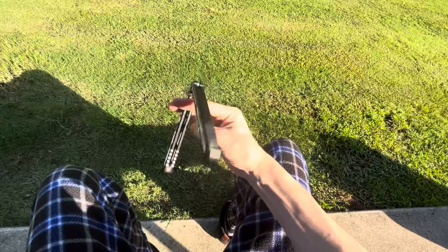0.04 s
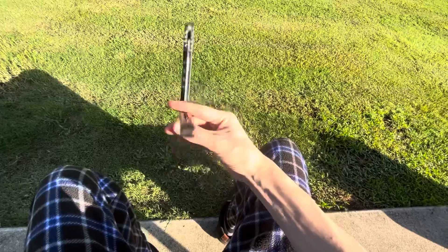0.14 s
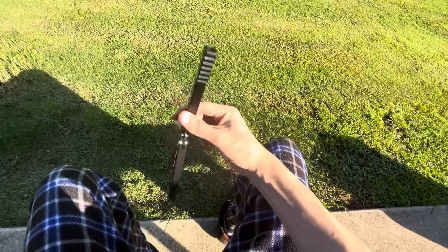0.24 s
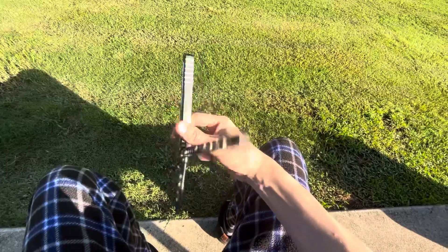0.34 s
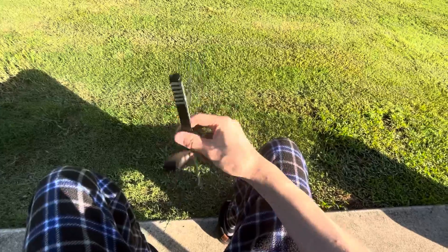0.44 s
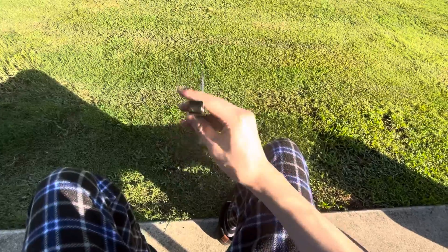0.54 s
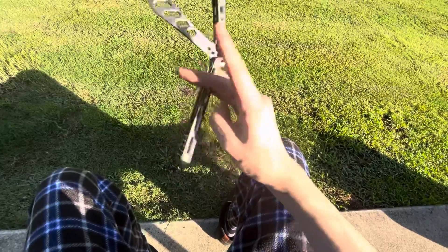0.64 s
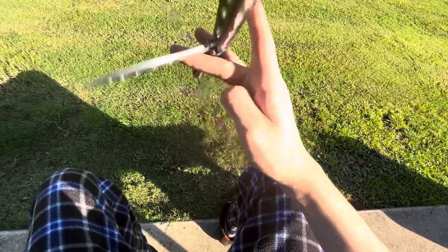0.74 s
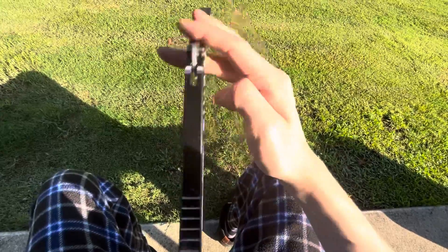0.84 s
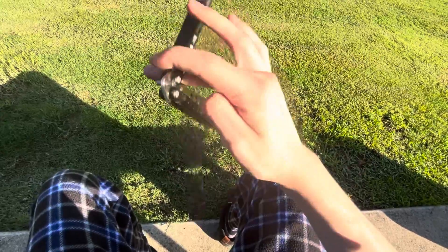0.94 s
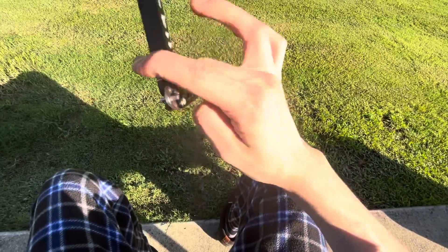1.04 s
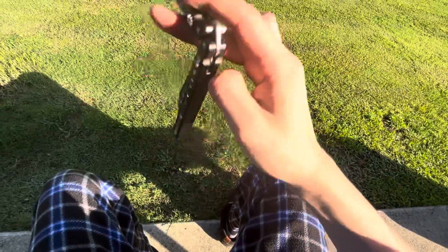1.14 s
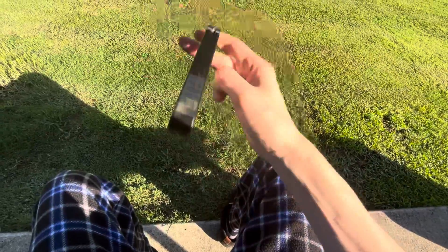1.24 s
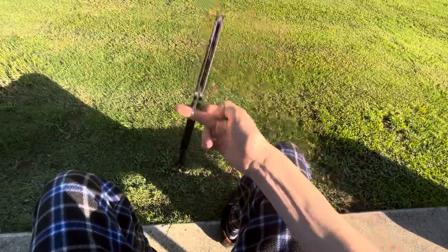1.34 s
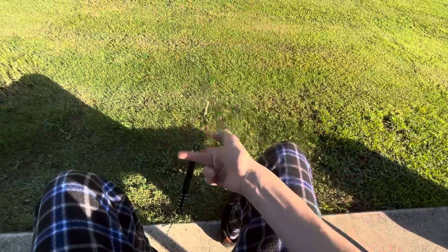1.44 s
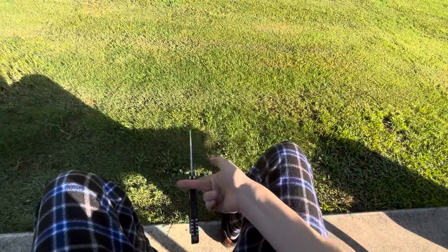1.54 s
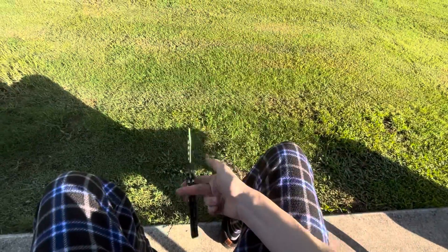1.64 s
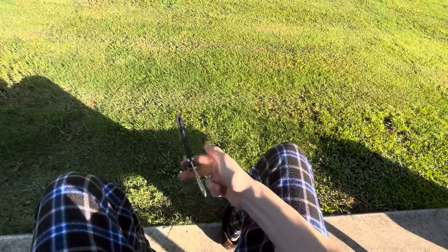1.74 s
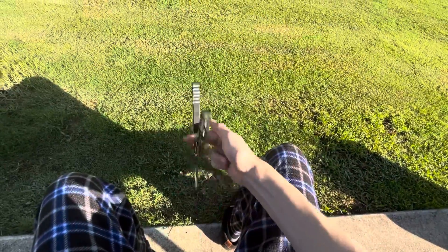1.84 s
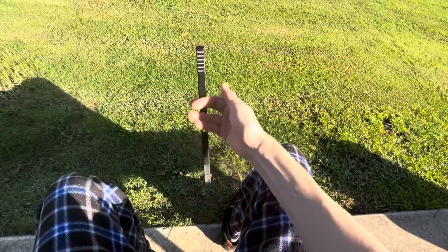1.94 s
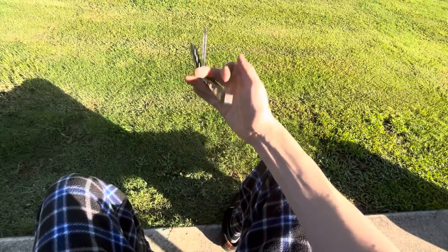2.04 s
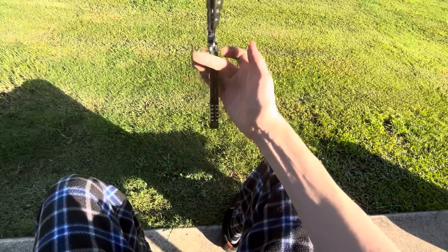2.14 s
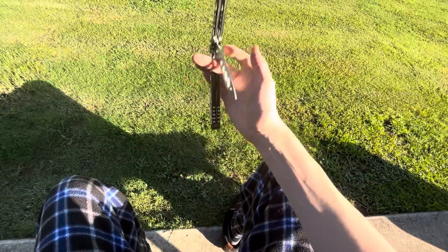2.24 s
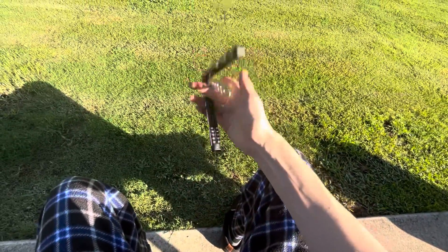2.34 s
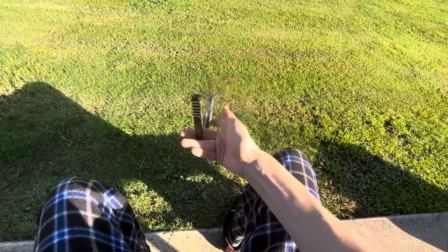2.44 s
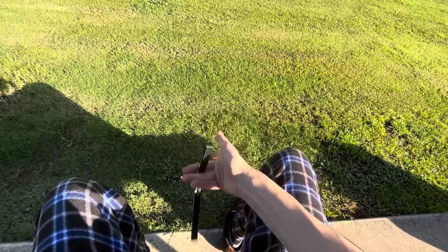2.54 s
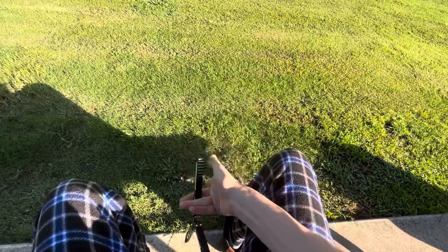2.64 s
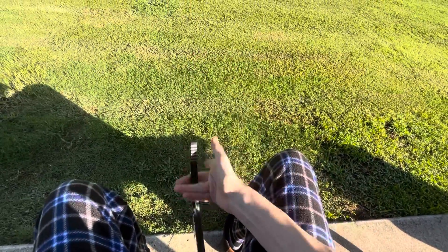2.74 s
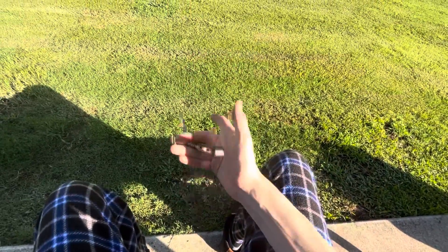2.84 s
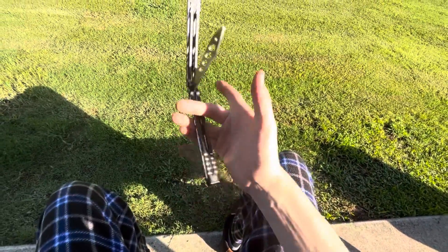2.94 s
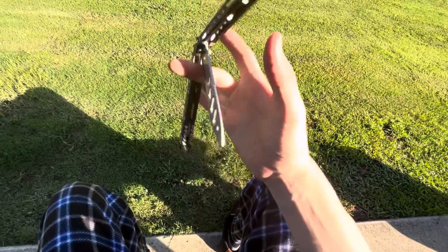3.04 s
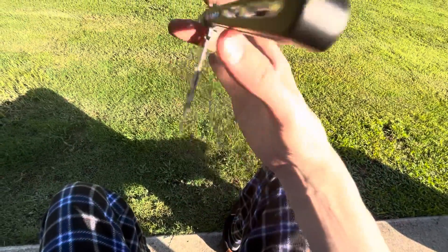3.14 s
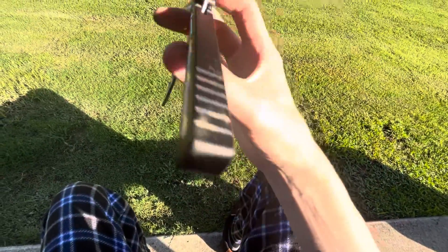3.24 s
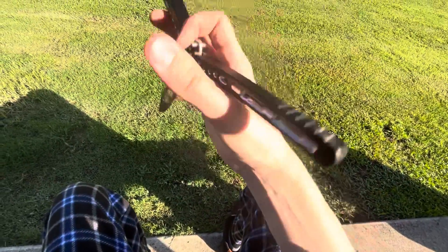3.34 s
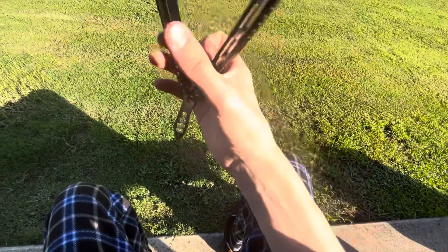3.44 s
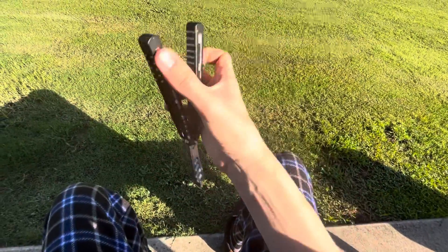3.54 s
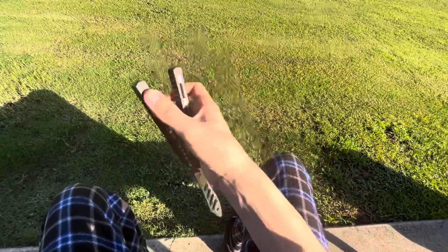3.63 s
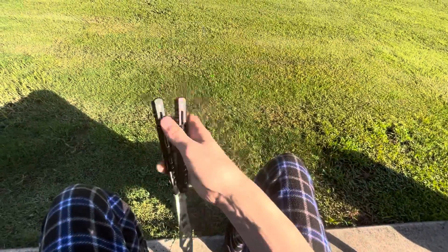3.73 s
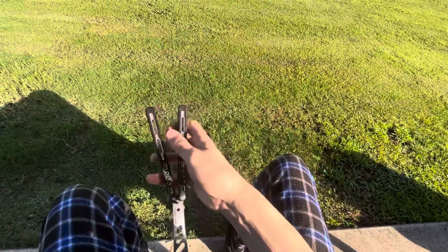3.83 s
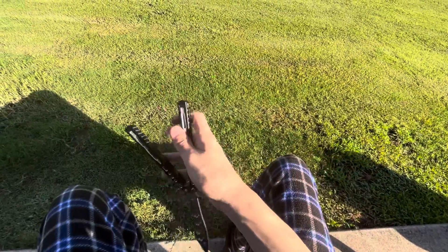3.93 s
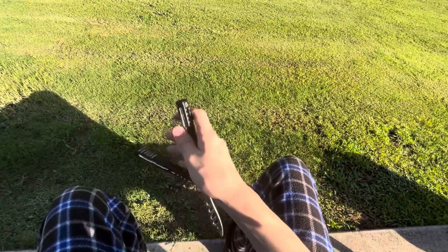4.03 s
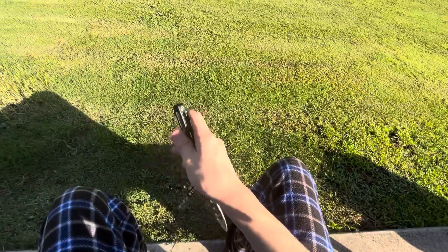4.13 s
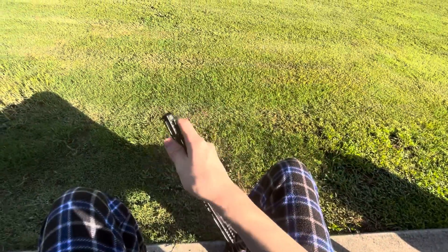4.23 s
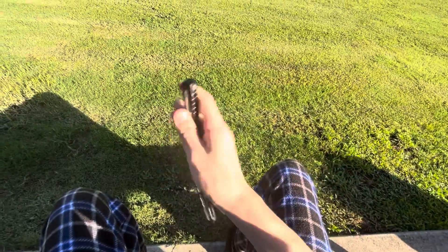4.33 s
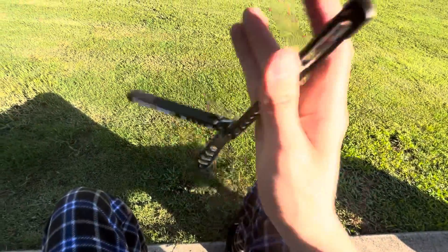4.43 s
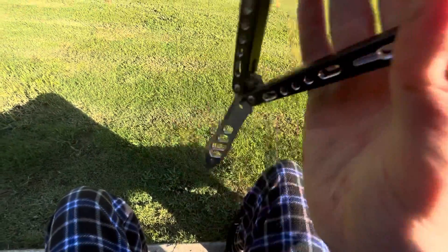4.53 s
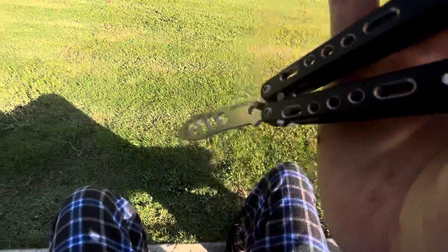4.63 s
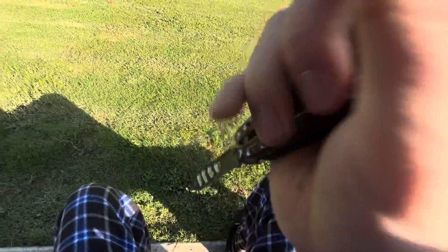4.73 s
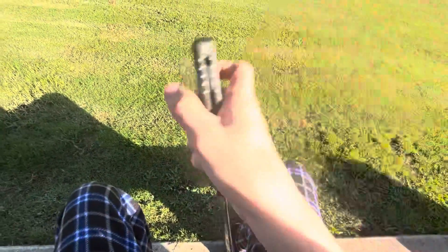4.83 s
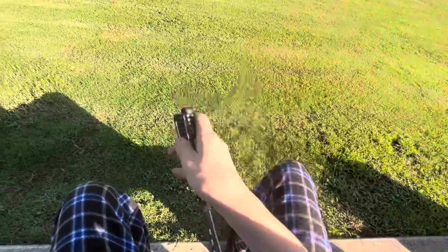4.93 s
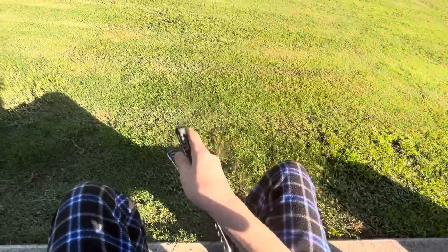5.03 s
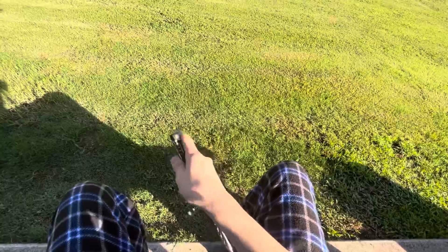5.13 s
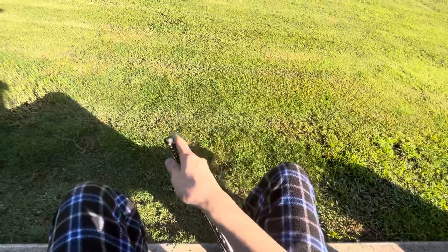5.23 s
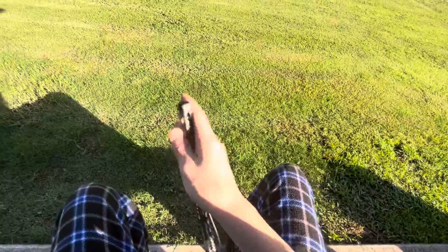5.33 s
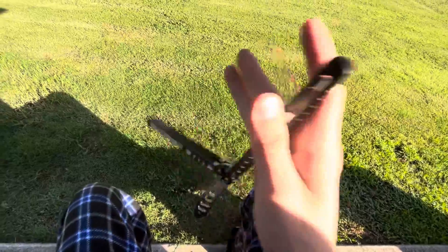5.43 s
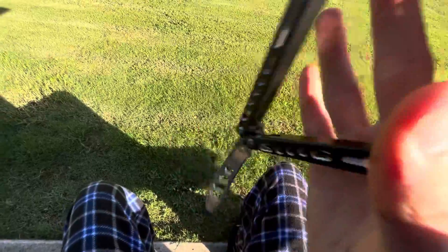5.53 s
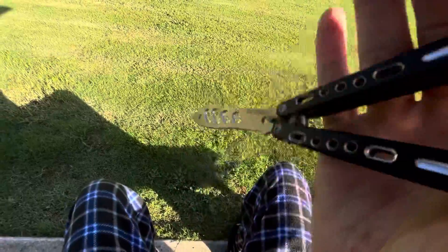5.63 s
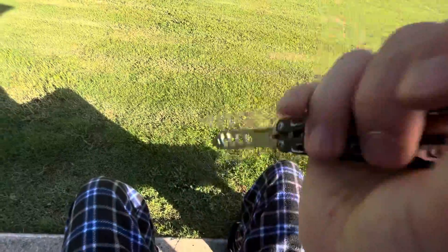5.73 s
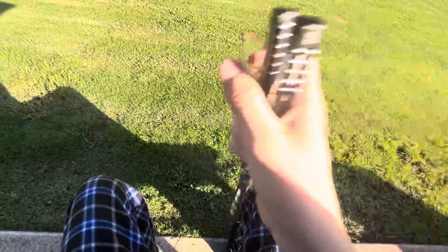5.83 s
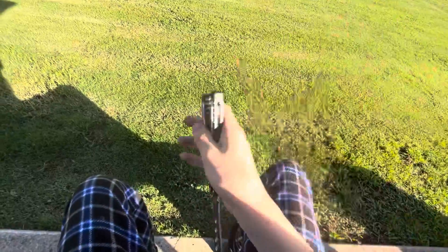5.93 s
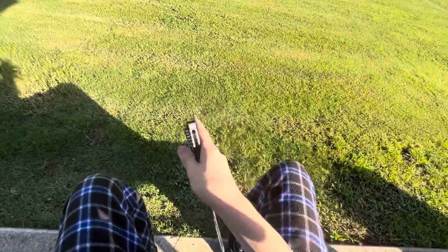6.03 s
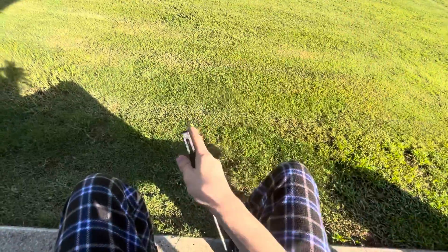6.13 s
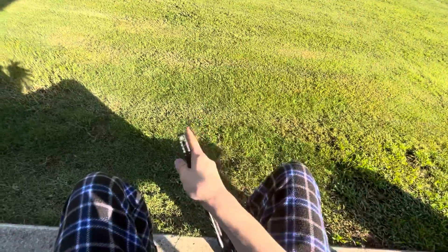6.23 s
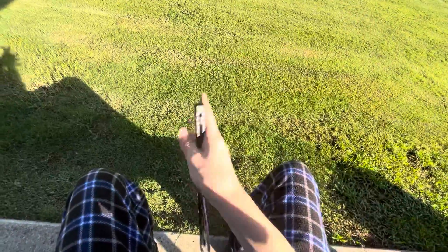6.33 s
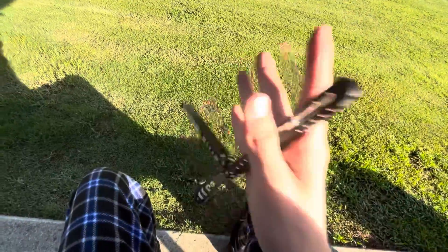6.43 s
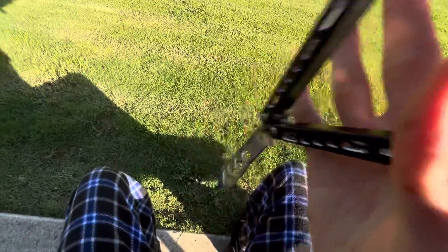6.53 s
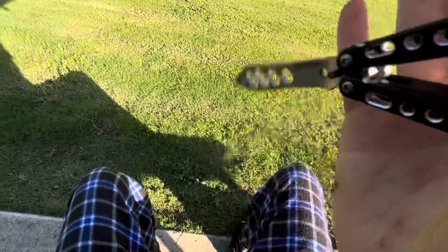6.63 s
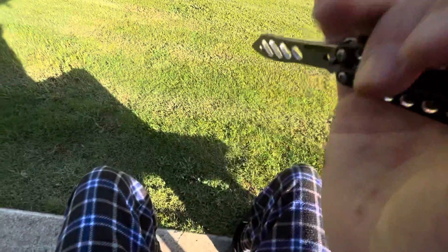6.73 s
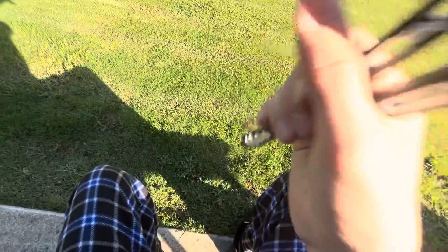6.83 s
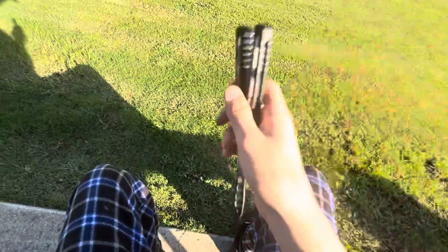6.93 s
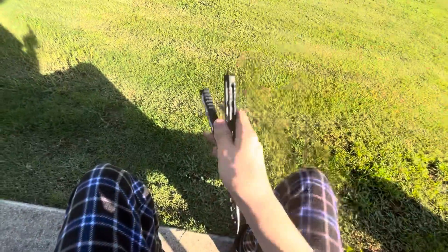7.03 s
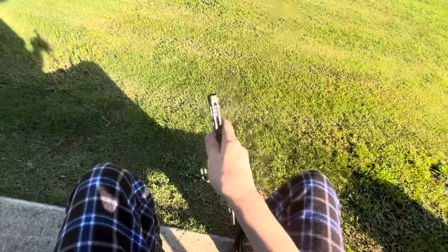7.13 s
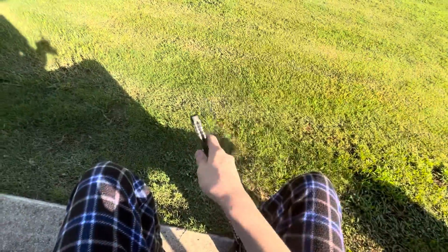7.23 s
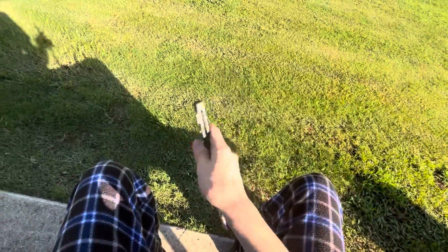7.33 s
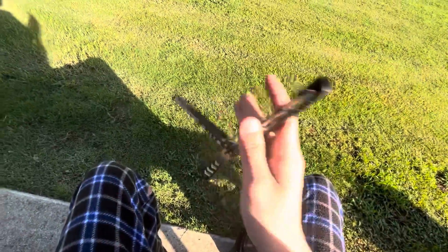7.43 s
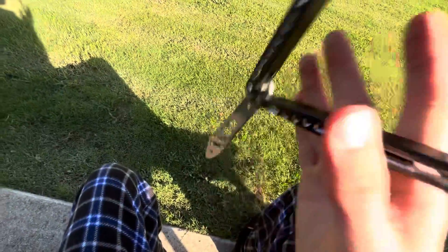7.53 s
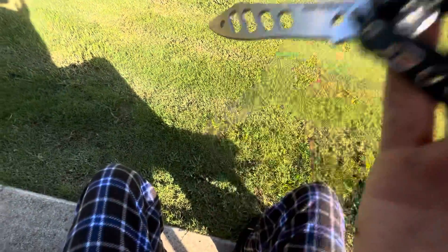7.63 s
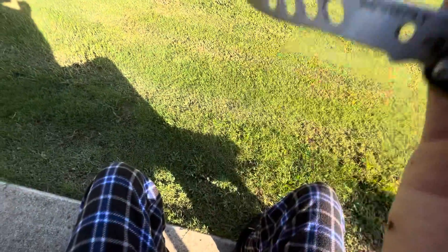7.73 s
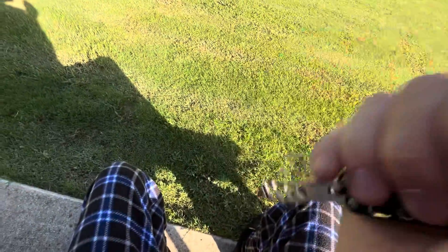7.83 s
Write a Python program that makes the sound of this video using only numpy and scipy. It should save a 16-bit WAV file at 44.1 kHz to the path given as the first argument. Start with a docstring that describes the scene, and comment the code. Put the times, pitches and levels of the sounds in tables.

```python
"""On a lawn, wind rumbles and leaves hiss throughout: flickering shaped noise at a phone's two microphone ports.
From the start a butterfly knife trainer is flipped close in front; its slotted handles strike damped ringing modes.
From 0.4 s an insect buzzes and far bird calls blur into soft noise swells; from 1.3 s birds whistle off to the right.
One far thump of decaying noise falls at 1.4 s, finger thuds lie between, and from 4.3 s low puffs hit the right port.
Near 4.6, 5.6, 6.6 and 7.6 s the blows crowd into rattles, with dense random taps as the handles shudder to rest."""
import sys
import numpy as np
from scipy import signal
from scipy.fft import rfft, irfft, next_fast_len
from scipy.io import wavfile
from scipy.ndimage import uniform_filter1d

SR = 44100
rng = np.random.default_rng(int(sys.argv[2]) if len(sys.argv) > 2 else 0)


def dump_mix(stems):
    """Bounce the given channels to the path in sys.argv[1] as a 16-bit WAV at rate SR."""
    frames = np.atleast_2d(stems).T  # one column per channel
    limited = np.clip(frames, -1, 1)  # hard clip at full scale
    pcm = np.round(limited * 32767).astype(np.int16)
    wavfile.write(sys.argv[1], SR, pcm)


N = 347067

# Source levels are nominal: port balance, flicker, scatter and the microphone's gain come after them.
# wind across the lawn, and broad hiss of leaves plus the wash around the rattles:
# (time [s], rumble level [dB], hiss level [dB])
AIR_LEVELS = [(0.0, -51.5, -64.5), (0.55, -52.5, -64.5), (1.36, -52, -65.5), (1.99, -52, -64),
              (2.25, -51, -59.5), (2.55, -54, -64), (3.15, -51, -63.5), (3.7, -52, -65), (4.36, -49.5, -64),
              (4.69, -50.5, -59), (5.1, -51, -66.5), (5.72, -51, -57.5), (6.05, -59, -64),
              (6.53, -63, -61.5), (6.93, -64.5, -64), (7.15, -55.5, -61.5), (7.43, -50, -62),
              (7.87, -61, -63)]
# spectra of wind rumble and of broad hiss: (frequency [Hz], density [dB per Hz])
RUMBLE_SPECTRUM = [(25, -53), (40, -9), (55, 5.5), (75, -2), (105, 4), (150, -1), (210, -10.5), (300, -24),
                   (500, -27), (800, -39)]
HISS_SPECTRUM = [(200, 9.5), (400, 0.5), (750, -7), (1300, -4), (1700, -7), (2700, -3.5), (4000, -6.5),
                 (5400, -4), (6500, -14), (9800, -15), (11500, -32), (16000, -33)]
# far bird whistles: (time [s], length [s], first pitch [Hz], last pitch [Hz], level [dB])
BIRD_WHISTLES = [(1.306, 0.21, 3640, 3540, -69), (1.7, 0.29, 3620, 3480, -72),
                 (2.23, 0.039, 4920, 4760, -58), (2.292, 0.043, 4880, 5640, -56),
                 (2.399, 0.048, 5300, 4950, -55), (2.446, 0.057, 5770, 4880, -56.5),
                 (3.11, 0.12, 2380, 2530, -63.5), (3.24, .12, 2500, 2490, -68.5),
                 (3.62, 0.033, 3430, 3570, -62), (3.68, 0.058, 2900, 3200, -60),
                 (7.004, 0.2, 8560, 9660, -68), (7.25, .06, 9100, 8700, -74),
                 (7.44, 0.13, 4070, 4250, -60.5)]
# insect buzzes near one pitch: (time [s], length [s], level [dB])
INSECT_BUZZES = [(0.424, 0.15, -69.5), (0.99, 0.093, -70), (1.798, 0.14, -76), (2.83, 0.19, -75),
                 (3.44, 0.17, -69.5), (4.038, 0.19, -71.5), (5.08, 0.24, -72.5), (6.22, .15, -71.5),
                 (6.953, .12, -70)]
INSECT_HZ, INSECT_WIDTH_HZ = 8270, 71
# far blurred bird calls, as soft narrow noise swells: (time [s], length [s], centre [Hz], level [dB])
BLURRED_CALLS = [(0.417, 0.2, 2560, -64), (0.715, 0.2, 2390, -68), (.9, 0.34, 2420, -66),
                 (1.976, 0.23, 4500, -58), (2.217, 0.35, 4370, -58), (2.829, 0.17, 2600, -62),
                 (3.302, 0.21, 2780, -66), (3.659, 0.32, 2820, -63.5), (4.052, 0.56, 2470, -66.5),
                 (6.307, 0.19, 2600, -75), (6.899, 0.39, 2700, -67)]
BLUR_WIDTH = 0.17  # share of the centre
THUMP_S, THUMP_DB, THUMP_T60_S = 1.438, -47, 0.52
# puffs of air on the right port: (time [s], length [s], level [dB])
AIR_PUFFS = [(4.301, 0.12, -50), (5.24, 0.075, -48), (5.548, 0.068, -30.5), (5.668, 0.096, -44.5),
             (5.736, .05, -33), (5.793, 0.063, -47), (5.878, 0.063, -44), (6.34, 0.042, -44),
             (6.45, 0.041, -47.5)]
PUFF_HZ = 83
BACK_PORT = -0.38  # gain: close low pressure reaches the left port weaker and reversed
# soft thuds and ticks of fingers on the handles: (time [s], level [dB], pitch [Hz], t60 [s])
FINGER_TAPS = [(.168, -45.5, 855, .02), (.191, -50, 750, 0.022), (.266, -47, 706, 0.022),
               (.288, -43.5, 680, 0.015), (0.298, -46.5, 1330, 0.01), (0.596, -55, 1410, .015),
               (2.289, -41.5, 296, 0.018), (2.385, -34, 292, 0.022), (2.798, -48, 4150, .008),
               (3.099, -42, 500, 0.014), (4.224, -47, 480, 0.019), (5.251, -44, 490, 0.016),
               (6.255, -42.5, 480, 0.016)]
# the handles shudder to rest: (time [s], length [s], level [dB])
HANDLE_SHUDDERS = [(4.664, 0.042, -22), (5.691, 0.052, -21), (5.726, 0.022, -37), (6.726, 0.029, -30),
                   (7.721, 0.056, -22.5)]
SHUDDER_RATE = 1000  # mean taps a second
# blows of handle on handle or pin: (time [s], clack level [dB], knock pitch [Hz],
# then levels above the clack [dB] of knock, edge, knock ring, blade ring and handle ring,
# left minus right [dB])
KNIFE_BLOWS = [(0.0027, -43.5, 2490, 1, 2.5, -30, -15, -32, -7),
               (0.0122, -49, 2120, 6, 5.5, -7, -15, -26, 5),
               (0.3462, -16, 2740, -11, 0.5, -28, -26, -29, -1.5),
               (0.3474, -20, 2950, -9, -9, -42, -20, -30, -1),
               (0.9582, -40.5, 2270, 9, 2, -16, -16, -18, 1),
               (1.4283, -36.5, 2390, 7.5, 8, -21, -16, -16, 4.5),
               (1.9646, -38.5, 2240, 0, -2, -30, -26, -40, -2),
               (2.0865, -18.5, 2550, 2, 3.5, -24, -15.5, -28, -2.5),
               (2.3819, -23, 2780, -10.5, -4, -23, -30, -29, 0), (2.39, -29, 2610, -9, 0, -24, -16, -34, 2),
               (2.72, -28.5, 2480, -5.5, -6.5, -39, -42, -28, -4.5),
               (3.0967, -49, 2800, 4, 0, -9, 11.5, -26, 3.5), (3.243, -60, 2220, 1, 3, 1, 1, 0, 2),
               (3.338, -57.5, 2560, -6, 5, -16, 0, 3, 2), (4.072, -54.5, 2650, 8, -6, -16.5, -31, -41, 0),
               (4.2249, -30, 2600, -6, -6, -18, -23, -26, -0.5),
               (4.411, -40.5, 2590, 0.5, -6, -23, -43, -25, -2),
               (4.5615, -12.5, 2550, -2, -5.5, -31, -20, -20.5, -4.5),
               (4.5958, -3.5, 2780, -24, -14.5, -49.5, -37, -21, -7.5),
               (4.6287, -14, 2610, -6.5, -5, -46, -43, -32, -7),
               (4.6486, -6, 2750, -10.5, -20, -34.5, -30, -29, -10),
               (4.6566, -9, 2490, -7, -16, -31, -24, -18, 2),
               (4.6655, -10, 2775, 1, -11, -26, -34, -35, -15),
               (4.6762, -14.5, 2820, -2, -9.5, -28.5, -23.5, -22, -13),
               (4.6818, -10, 2770, -21.5, -7, -21, -42, -35, 11),
               (4.692, -14.5, 2720, -7, -12, -29, -25, -32, -9.5),
               (4.6967, -5.5, 2340, -15, -11, -26.5, -35, -29.5, -2),
               (5.2513, -31, 2420, 0, -8, -30.5, -22, -37, -3),
               (5.368, -32, 2620, -2.5, -10.5, -16, -43, -36, -4.5),
               (5.5449, -11, 2530, -3, -6, -28, -22, -25, -2),
               (5.5916, -14.5, 2580, -3, 1.5, -35.5, -20, -7, -5),
               (5.6251, -15, 2710, -0.5, -4.5, -31.5, -47, -42, -6.5),
               (5.646, -11.5, 2620, -4, 1.5, -42.5, -22, -2, 0.5),
               (5.666, -13, 2680, 1, -7, -27.5, -51, -33, -6.5),
               (5.681, -8, 2820, -6.5, -7.5, -34, -47, -38, -4),
               (5.692, -10.5, 2490, -11, 0, -32, -31.5, -31, 11.5),
               (5.7003, -15, 2900, -9.5, -2, -28.5, -17, -24.5, -14),
               (5.707, -12, 2500, -15, -7, -32.5, -23, -22, 10),
               (5.7132, -15.5, 2600, -27, -8, -25, -26.5, -20, 6),
               (5.7191, -16.5, 2550, -11, 1.5, -28.5, -26, -31, 15),
               (5.734, -24, 2400, -16, -1, -15.5, -41, -33, -8.5),
               (6.2552, -30.5, 2480, -4, -5.5, -43.5, -24, -36, 2),
               (6.379, -22.5, 2640, 1, -11, -39, -43, -43, -5),
               (6.403, -40, 2830, 1, -8, -24, -35, -37, -4),
               (6.5465, -12.5, 2380, -5, -4.5, -30, -19, -34, 0),
               (6.5853, -10.5, 2545, -9.5, -0.5, -48, -15, -15.5, -2.5),
               (6.6115, -14.5, 2740, -4.5, -8, -33, -24, -20.5, 5),
               (6.6313, -13, 2800, -7.5, -5, -36.5, -34, -31, -10),
               (6.6488, -11, 2596, -5, -2, -25.5, -21, -20.5, 2),
               (6.6688, -10, 2780, -5, -9, -41, -35, -47, -1),
               (6.6889, -11, 2760, -7, -4.5, -46, -21.5, -24, 4),
               (6.7099, -10, 2670, -8, -8, -48.5, -30, -43, -5),
               (6.7391, -21, 2400, -19.5, -18, -28, -17, -25, -19),
               (6.7433, -8, 2890, -10.5, -9, -23.5, -34, -30.5, -5.5),
               (7.0659, -38, 2550, 11, -3, -32.5, -35, -39, 1),
               (7.0795, -47, 2340, 8, -2, -10, -24, -33, -4),
               (7.232, -35, 2400, 7.5, -2.5, -18, -22, -35, -1),
               (7.3964, -27.5, 2470, 2, -7.5, -40.5, -31, -38, -1.5),
               (7.417, -40.5, 2280, 2.5, -11, -18.5, -28, -42, -4),
               (7.5545, -9.5, 2420, -7, -7, -23, -30, -27, -1),
               (7.6193, -14.5, 2960, -7, 2, -39, -37, -4.5, -1.5),
               (7.661, -16.5, 2620, 5.5, -3, -12, -31, -39, -5),
               (7.689, -8.5, 2860, -5.5, -7.5, -50, -43, -26, -4),
               (7.711, -23.5, 2400, 1, 1, -30, -36, -24, 2),
               (7.7255, -12, 2770, -8, -12, -31, -29, -40, -15.5),
               (7.737, -12.5, 2660, -9, -14, -20, -29, -34, -12),
               (7.7455, -15.5, 2680, -6, -6, -30, -22, -25, 7.5),
               (7.7519, -15, 2600, -15, -7, -22.5, -31, -26, 3)]
# names of the mode families of the knife, in the order of their levels in a blow: (family)
MODE_FAMILIES = ["clack", "knock", "knock ring", "thud", "crack", "edge", "blade ring", "handle ring"]
# short modes of the knife: (family, frequency [Hz], level [dB], t60 [s])
KNIFE_MODES = [("clack", 6600, 0, .015), ("clack", 6250, -7.5, 0.01), ("clack", 7050, -5.5, 0.0092),
               ("knock", 2585, 0, 0.013), ("knock", 2240, -4.5, 0.0058), ("knock", 3073, -6, 0.0067),
               ("thud", 330, -5, 0.023), ("thud", 550, -4, 0.0069), ("thud", 900, -5.5, 0.0046),
               ("thud", 1250, -2, 0.012), ("thud", 1677, 2.5, 0.0059), ("crack", 3624, -7.5, 0.0071),
               ("crack", 4100, -7, 0.0071), ("crack", 4600, -4.5, 0.007), ("crack", 5150, -1.6, .011),
               ("crack", 5650, -0.5, .007), ("edge", 7700, -3.5, .007), ("edge", 8500, -7.5, 0.0058),
               ("edge", 9300, -5.5, 0.0048), ("edge", 10600, -9, 0.0037), ("edge", 11350, -1.2, 0.011),
               ("edge", 11000, -8, 0.005), ("edge", 13200, -13, .005), ("edge", 14600, -12, .006),
               ("edge", 15500, -19.5, 0.015), ("clack", 6640, -32, .06)]
# long rings of the knife: (family, frequency [Hz], level [dB], t60 [s])
KNIFE_RINGS = [("knock ring", 2560, 1, .09), ("blade ring", 10150, 5, .1), ("blade ring", 9860, -1, .09),
               ("handle ring", 13730, 3, .065), ("handle ring", 14080, -3, .11)]
# families that follow from the others:
# (level above the clack [dB], then slopes [dB per dB] on clack, knock and edge level)
THUD_LEVEL_RULE = (-16.5, -.22, 0.1, 1.42)
CRACK_LEVEL_RULE = (-3, 0.05, 0.32, 0.2)
CLACK_SPREAD_HZ, SCATTER_DB = 450, 6  # full random range from blow to blow
SWELL_LEAD_S, SWELL_S = 0.0017, 0.0016  # the swell of a blow: its start ahead of the listed time; its rise time
MUTE_DB, PORT_LAG_S = -16, 0.00023  # left over after the next contact; delay of the swell at the left port
FIRM_HZ, FIRM_TURNS, FIRM_TURNS_PER_HZ = 9000, -.77, .000102  # phase step between the ports above FIRM_HZ
SCRAPE_DB, SCRAPE_HZ, SCRAPE_WIDTH_HZ, SCRAPE_T60_S = -18, 3900, 2340, 0.0089  # level is above the clack
WASH_DB, WASH_T60_S = -29, .013  # near wash
TOP_HZ = 16900  # upper limit of the microphone


def undb(db):
    """dB to gain."""
    return 10 ** (np.asarray(db) / 20)


def add(out, s, sound):
    """Mix a two-channel sound in at s seconds."""
    i = int(s * SR)
    out[:, i:i + sound.shape[1]] += sound[:, :N - i]


def fade(t, t60_s):
    """Exponential decay, -60 dB at t60."""
    return np.exp(-np.log(1000) * t / t60_s)


def walk(rate):
    """Random levels held 1 / rate s and slewed twice; spread near 1."""
    hold = int(SR / rate)
    steps = np.repeat(rng.standard_normal(N // hold + 1), hold)
    return 0.49 * uniform_filter1d(uniform_filter1d(steps, hold), hold)[:N]


def band(hz, width_hz, size=N):
    """Two unrelated channels of noise around one pitch, rms 1."""
    f = np.arange(size // 2 + 1) * SR / size
    bell = np.exp(-.5 * ((f - hz) / width_hz) ** 2)
    noise = irfft(rfft(rng.standard_normal((2, size))) * bell, size)
    return noise / np.sqrt(np.mean(noise ** 2))


def air(spectrum, alike_hz, flicker_db):
    """Shaped noise whose octaves flicker alone; the ports grow more alike below alike_hz; their mean has rms 1."""
    size = next_fast_len(N)
    f = np.maximum(np.arange(size // 2 + 1) * SR / size, 1)
    hz, db = np.transpose(spectrum)
    shape = undb(np.interp(np.log(f), np.log(hz), db, left=-80))
    mid, side = rfft(rng.standard_normal((2, size))) * shape
    side = side * np.clip(f / alike_hz, .3, 1.05)
    ports = np.array([mid + side, mid - side])
    out = 0
    for octave in np.arange(np.floor(np.log2(hz[0])), np.log2(hz[-1]) + 1):
        part = np.cos(np.pi / 2 * np.clip(np.log2(f) - octave, -1, 1)) ** 2
        out = out + irfft(ports * part, size)[:, :N] * undb(flicker_db * walk(9))
    return out / np.sqrt(np.mean(out.mean(0) ** 2))


def rumble_and_hiss():
    """Wind rumble, and broad hiss of leaves plus the wash around the rattles: two noises on slow level curves."""
    s, *columns = np.transpose(AIR_LEVELS)
    rumble_db, hiss_db = (np.interp(np.arange(N) / SR, s, column) for column in columns)
    rumble = air(RUMBLE_SPECTRUM, 600, flicker_db=2.0) * undb(rumble_db)
    hiss = air(HISS_SPECTRUM, 600, flicker_db=2.5) * undb(hiss_db)
    return rumble + hiss


def blurred_calls():
    """Far blurred bird calls: narrow noise that swells and fades."""
    out = np.zeros((2, N))
    for s, length_s, hz, db in BLURRED_CALLS:
        size = int(length_s * SR)
        noise = band(hz, BLUR_WIDTH * hz, size=32768)[:, :size]
        add(out, s, undb(db) * noise * np.hanning(size) ** .5)
    return out


def wildlife():
    """Gliding whistles of far birds, off to the right, and a narrow insect buzz."""
    out = np.zeros((2, N))
    for s, length_s, first_hz, last_hz, db in BIRD_WHISTLES:
        size = int(length_s * SR)
        phase = np.cumsum(np.linspace(first_hz, last_hz, size)) * 2 * np.pi / SR
        whistle = np.sin(phase + np.array([[1.5], [0]])) * np.array([[1.1], [1.9]])
        add(out, s, undb(db) * np.hanning(size) ** .5 * whistle)
    # moving air breaks the whistles up on their way
    out = out * undb(-1.5 + 8.2 * walk(90))
    buzz = band(INSECT_HZ, INSECT_WIDTH_HZ, size=next_fast_len(N))
    for s, length_s, db in INSECT_BUZZES:
        size, i = int(length_s * SR), int(s * SR)
        add(out, s, undb(db) * np.hanning(size) ** .5 * buzz[:, i:i + size])
    return out


def thump():
    """A far bang smeared by echoes, as decaying noise: the treble dies first."""
    out, t = np.zeros((2, N)), np.arange(20000) / SR
    low = band(300, 100, size=20000) * fade(t, THUMP_T60_S)
    high = band(770, 800, size=20000) * fade(t, 0.72 * THUMP_T60_S) * undb(-2.5)
    add(out, THUMP_S, undb(THUMP_DB) * (low + high) * np.minimum(t / 0.0055, 1))
    return out


def puffs():
    """Short low buffets of air pushed by the hand, as windowed low noise."""
    out = np.zeros((2, N))
    for s, length_s, db in AIR_PUFFS:
        size = int(length_s * SR)
        buffet = band(PUFF_HZ, 0.83 * PUFF_HZ, size=8192)[0, :size] * np.hanning(size) ** 0.47
        buffet = buffet / np.sqrt(np.mean(buffet ** 2))
        add(out, s, undb(db) * buffet * np.array([[BACK_PORT], [1]]))
    return out


def fingers():
    """Dull thuds and ticks: damped sines, stronger on the right."""
    out, t = np.zeros((2, N)), np.arange(3000) / SR
    for s, db, hz, t60_s in FINGER_TAPS:
        tap = np.sin(2 * np.pi * hz * t) * fade(t, t60_s)
        add(out, s, undb(db) * tap * np.array([[.8], [1.2]]))
    return out


def shudder():
    """Dense random taps of uneven size into the short modes, swelling briefly and dying away."""
    taps, t = np.zeros((2, N)), np.arange(900) / SR
    for s, length_s, db in HANDLE_SHUDDERS:
        draw = rng.random((3, int(length_s * SR)))
        sizes = (draw[0] < SHUDDER_RATE / SR) * undb(-12 * draw[1:]) * np.array([[.7], [1.2]])
        add(taps, s, undb(db) * sizes * np.cos(np.linspace(-1.2, np.pi / 2, draw.shape[1])))
    above_db = {"clack": 0, "knock": -8, "thud": -22, "crack": -6, "edge": -7}
    ring = np.zeros((2, len(t)))
    for family, hz, db, t60_s in KNIFE_MODES:
        tone = np.sin(2 * np.pi * (hz * t + rng.random((2, 1))))
        ring += undb(db + above_db[family]) * tone * fade(t, t60_s)
    return signal.fftconvolve(taps, ring, axes=1)[:, :N]


def knife():
    """Each blow rings all modes with its own phases; the next contact mutes what still rings."""
    out, t = np.zeros((2, N)), np.arange(5000) / SR
    modes = KNIFE_MODES + KNIFE_RINGS
    group = np.array([MODE_FAMILIES.index(mode[0]) for mode in modes])
    hz, db, t60_s = np.transpose([mode[1:] for mode in modes])
    clack, knock, thud = (group == MODE_FAMILIES.index(name) for name in ("clack", "knock", "thud"))
    chance = rng.random((len(KNIFE_BLOWS), 4, len(hz)))
    # the next blow, or the hand closing at the end of a shudder
    times = [blow[0] for blow in KNIFE_BLOWS]
    stops = np.sort(times + [s + length_s for s, length_s, _ in HANDLE_SHUDDERS] + [np.inf])
    nexts = stops[np.searchsorted(stops, times, side="right")]
    grit = band(SCRAPE_HZ, SCRAPE_WIDTH_HZ, size=65536)
    for blow, following, draw in zip(KNIFE_BLOWS, nexts, chance):
        s, clack_db, knock_hz, knock_db, edge_db, low_db, blade_db, handle_db, pan_db = blow
        pitch_draw, level_draw, phase_draw, step_draw = draw
        balance_db = np.array([[pan_db], [-pan_db]]) / 2

        # the grip shifts the modes a little from blow to blow, the shortest most
        pitch = hz * (1 + 0.0006 * (pitch_draw - .5) / t60_s)
        pitch[clack] = hz[clack] + CLACK_SPREAD_HZ * (pitch_draw[0] - .5)
        pitch[knock] = hz[knock] * knock_hz / hz[knock][0]

        rules = [THUD_LEVEL_RULE, CRACK_LEVEL_RULE]
        thud_db, crack_db = np.dot(rules, [1, clack_db, knock_db, edge_db])
        above_db = np.array([0, knock_db, low_db, thud_db, crack_db, edge_db, blade_db, handle_db])
        gain = undb(clack_db + db + above_db[group] + SCATTER_DB * (level_draw - 1))

        # the top treble nearly keeps its phase step between the ports;
        # below that, each mode's phase step is random from blow to blow
        firm_step = FIRM_TURNS + FIRM_TURNS_PER_HZ * pitch + 0.05 * (step_draw - .5)
        step = np.where(pitch > FIRM_HZ, firm_step, step_draw)
        turns = phase_draw + np.array([step, 0 * step])
        ports = gain * np.exp(2j * np.pi * turns) * undb(balance_db)
        # make up for the decay during the left port's lag
        lagged = ports[0] * np.exp(PORT_LAG_S * np.log(1000) / t60_s)
        # thuds reach the left port weaker and reversed
        ports[0] = np.where(thud, BACK_PORT * ports[1], lagged)
        ringing = np.exp(2j * np.pi * pitch[:, None] * t) * fade(t - SWELL_LEAD_S, t60_s[:, None])
        sound = np.imag(ports @ ringing)

        i = int(level_draw[0] * (grit.shape[1] - len(t)))
        scrape = grit[:, i:i + len(t)] * fade(t - SWELL_LEAD_S, SCRAPE_T60_S)
        sound += scrape * undb(clack_db + SCRAPE_DB + balance_db)
        # each blow's sound swells in over a millisecond or two, a little later on the left
        since_start = np.maximum(t - np.array([[PORT_LAG_S], [0]]), 0)
        swell = 1 - np.exp(-(since_start / SWELL_S) ** 2)
        mute = np.where(t > following - s + SWELL_LEAD_S, undb(MUTE_DB), 1)
        add(out, max(s - SWELL_LEAD_S, 0), sound * swell * mute)
    return out


def wash(metal):
    """The metal smeared by decaying noise: a short wash off hand and body and a faint far one."""
    t = np.arange(4000) / SR
    near = undb(WASH_DB) * fade(t, WASH_T60_S)
    far = undb(-48.5) * fade(t, 0.13)
    echoes = rng.standard_normal((2, len(t))) * (near + far)
    return signal.fftconvolve(metal, echoes, axes=1)[:, :N]


def scene():
    """Lawn and far sounds behind, the hand and the knife with its wash close in front."""
    background = rumble_and_hiss() + blurred_calls() + wildlife() + thump()
    hand = puffs() + fingers()
    metal = shudder() + knife()
    return background + hand + metal + wash(metal)


def record(dry):
    """The phone's microphone rounds the loudest peaks and cuts the top."""
    rounded = np.tanh(1.265 * dry) / 1.035
    top_cut = signal.ellip(12, .2, 100, TOP_HZ, fs=SR, output="sos")
    return signal.sosfilt(top_cut, rounded)


dry = scene()
out = record(dry)
dump_mix(out)
```